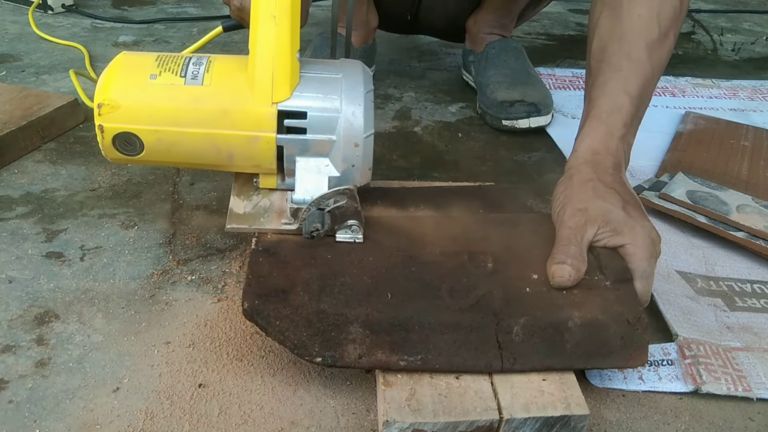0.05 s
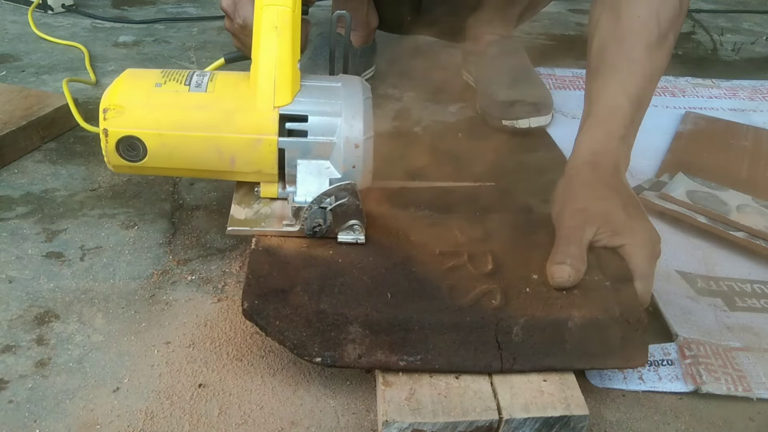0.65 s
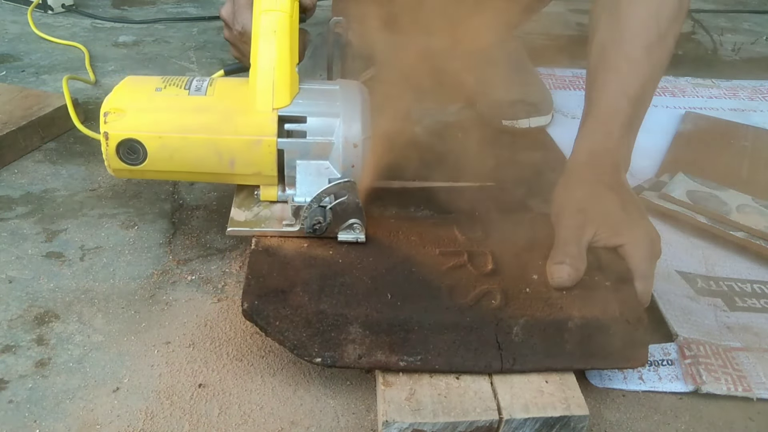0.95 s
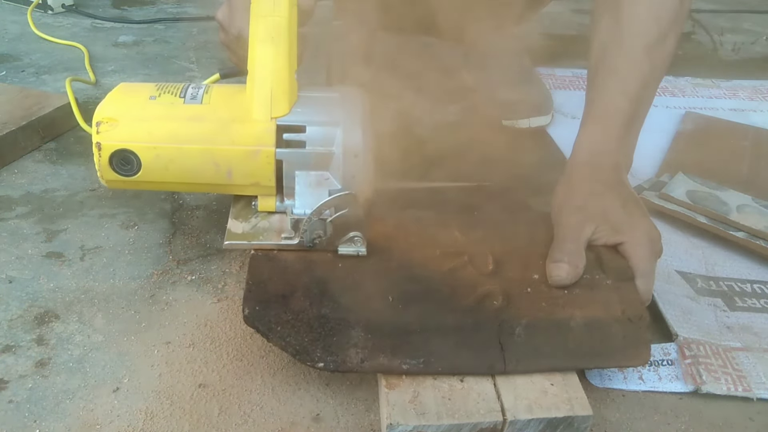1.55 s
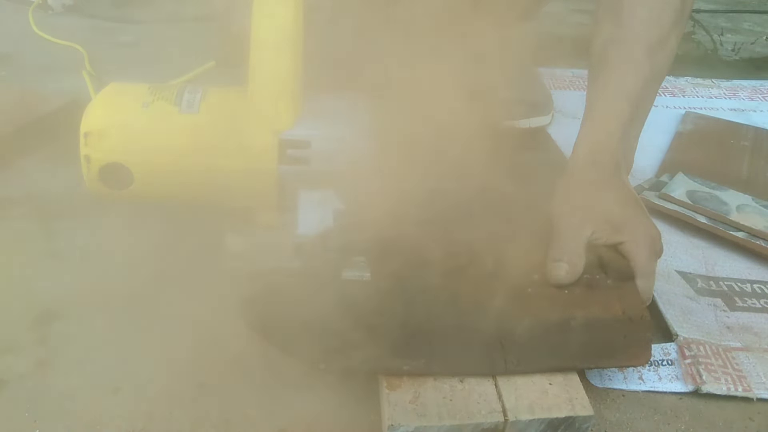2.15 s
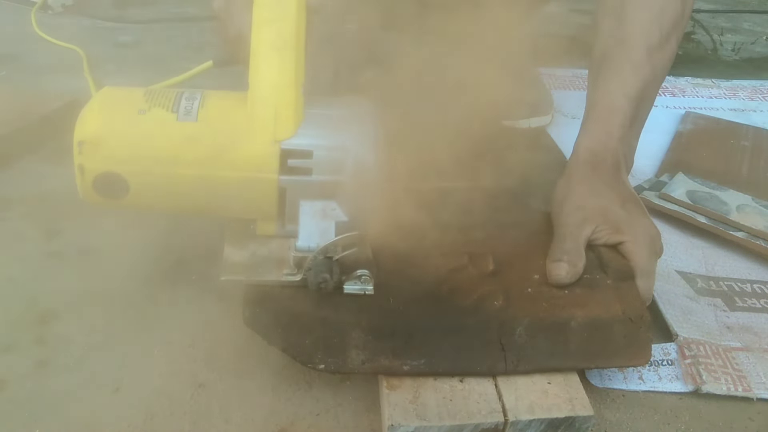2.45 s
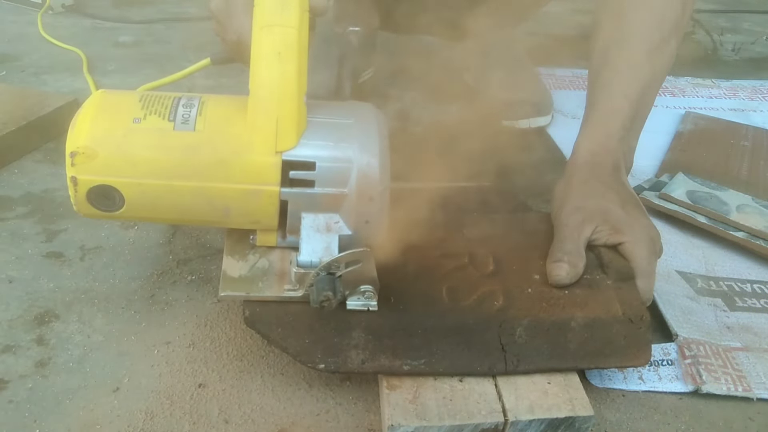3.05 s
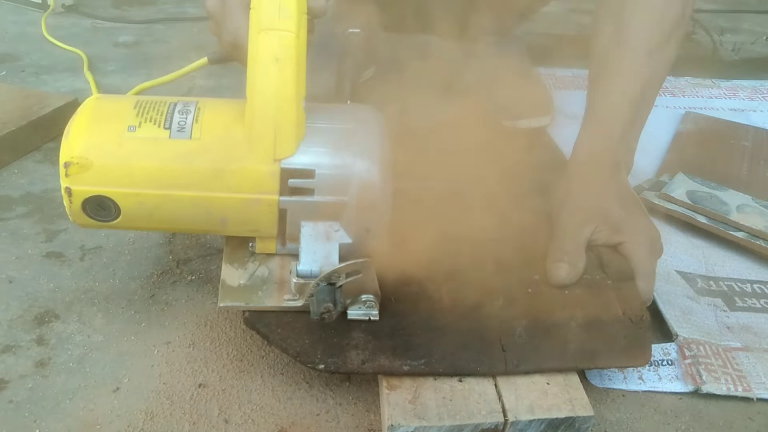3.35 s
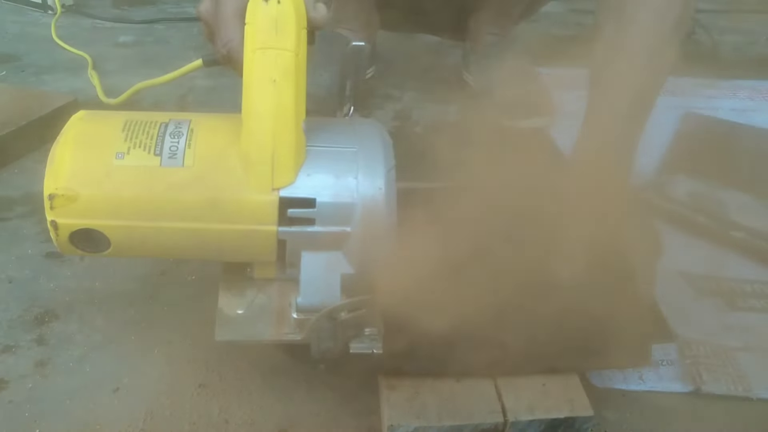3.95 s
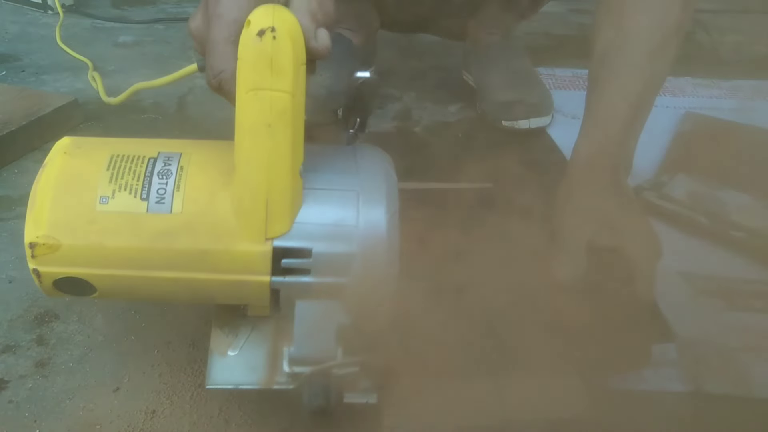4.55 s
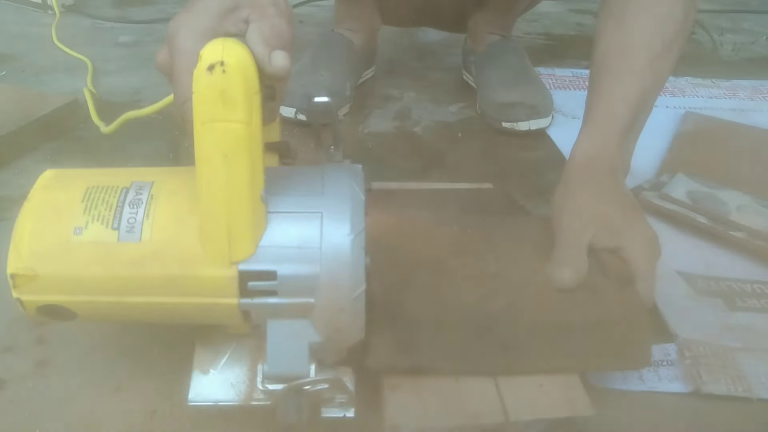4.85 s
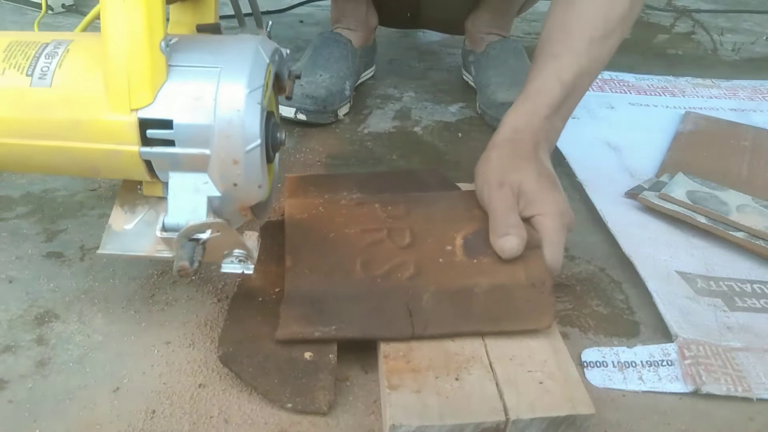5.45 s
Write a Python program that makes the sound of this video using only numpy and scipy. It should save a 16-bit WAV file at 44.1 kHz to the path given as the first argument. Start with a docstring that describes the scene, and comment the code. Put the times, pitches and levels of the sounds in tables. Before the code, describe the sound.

A handheld power cutter grinds through a clay tile close to the microphone. Its whine sags and recovers under load, over a gritty rasp and hiss, while the tile howls and the steel disc sings shifting high notes. Near the end the cut-off piece breaks away with a brief rattle, and the blade screeches against the cut edge as the motor starts to slow. Fan rush and a faint low hum lie underneath.

```python
"""At a workbench, close by, a handheld power cutter grinds its diamond blade through a clay tile.
The motor sags and recovers with the load, and the grit rasps once a turn. The tile howls, and the
steel disc sings one note after another as the slot pinches it. The cut-off piece breaks away and
rattles; the motor coasts down while the blade screeches along the cut edge.
Under it all are the rush of the cooling fan and a faint low hum."""
import sys
import numpy as np
from scipy import signal
from scipy.fft import rfft, irfft, next_fast_len
from scipy.io import wavfile
from scipy.ndimage import uniform_filter1d, minimum_filter1d, map_coordinates

SR = 44100
rng = np.random.default_rng(int(sys.argv[2]) if len(sys.argv) > 2 else 0)


def wrap_up_sound(samples):
    """Save the sound to the file named by the first command line argument, as 16-bit audio."""
    columns = np.atleast_2d(samples).T
    # keep every value between -1 and 1, then stretch to whole-number steps
    tamed = np.clip(columns, -1, 1)
    steps = np.round(tamed * 32767).astype(np.int16)
    wavfile.write(sys.argv[1], SR, steps)


N = 247469
T = np.arange(N) / SR

# Levels in the tables are relative: each layer adds its own gain.
# Tones of the background hum: pitch_hz, level_db
HUM_TONES = [(48.4, -71.5), (96.9, -66.5), (177.6, -69.5)]
# Blade speed under power, sagging when the blade is pushed: time_s, turns_per_s
POWERED_SPEED = [(0, 140), (.25, 161), (.4, 170), (.62, 177), (1.1, 172), (1.65, 163), (2.65, 171),
                 (2.8, 143), (3, 118), (3.2, 100), (3.42, 130), (3.55, 139), (3.72, 110), (3.85, 132),
                 (4.07, 152), (4.19, 133), (4.45, 151), (4.83, 162)]
# Tone colour of the fan's rush: pitch_hz, level_db
FAN_SPECTRUM = [(20, 0), (100, -10.5), (300, -9.5), (600, -5), (880, 4.5), (1200, -3), (1600, 0),
                (2500, 0.5), (3200, -6.5), (4200, 4.5), (5100, 1), (5800, -18), (7000, -10.5), (9000, -7),
                (15500, -15.5)]
# Whines on a multiple of the blade speed and on the multiples either side of it:
# start_s, end_s, multiple, level_db, neighbours_relative_db
BLADE_WHINES = [(0.164, 0.81, 13, -29, -5), (1.128, 1.424, 6, -33, -31), (1.92, 2.29, 3, -56, -15),
                (2.78, 3.15, 7, -49, -32), (3.539, 4.015, 7, -37, -11), (4, 4.69, 7, -48, -11)]
# The cut-off piece knocks on the boards: time_s, level_db
OFFCUT_KNOCKS = [(4.747, -17.5), (4.756, -14.5), (4.784, -22.5), (4.805, -19.5), (4.82, -17),
                 (4.833, -17.5), (4.859, -25.5), (4.872, -32)]
# Notes that piece rings with: pitch_hz, level_db, ring_s (time to fade by 60 dB)
OFFCUT_NOTES = [(817, -9, 0.1), (1020, -0.5, 0.1), (1080, -18, 0.04), (2000, -12.5, 0.03),
                (2950, -11.5, 0.027)]
# Tone colours of the tile's rumble, the slot's rasp and the flying grit's fizz: pitch_hz, level_db
RUMBLE_SPECTRUM = [(20, -16.5), (50, -23), (130, -3), (250, -1), (450, 1), (650, -2), (1000, 0),
                   (2500, -63)]
RASP_SPECTRUM = [(300, -11), (650, -8.5), (800, -6), (980, 6.5), (1250, -1), (1550, 8.5), (1900, -0.5),
                 (3000, -2), (3600, 3), (4300, 1.5), (5200, 10), (5900, -2), (8000, -7), (16000, -55)]
FIZZ_SPECTRUM = [(1500, -12), (3500, -53), (5000, 8), (6000, 11.5), (6800, 0.5), (8500, 3.5), (9300, 1),
                 (10300, 4.5), (11200, 4.5), (12000, 11), (12800, 1), (14000, 6.5), (14800, 5),
                 (15800, -24)]
# Loudness of those three over time: time_s, level_db
RUMBLE_LOUDNESS = [(0.0, -31.5), (0.8, -35.5), (1.12, -60), (2.22, -47), (2.43, -51), (3.25, -67),
                   (3.43, -40.5), (3.49, -51), (4.02, -38.5), (4.14, -45), (4.19, -38.5), (4.42, -48.5),
                   (4.66, -48.5), (4.7, -55)]
RASP_LOUDNESS = [(0.0, -25), (0.1, -49), (0.21, -32), (0.34, -44.5), (0.37, -41), (0.65, -66),
                 (1.62, -51.5), (1.69, -54), (1.74, -53.5), (4.32, -56), (4.67, -54.5), (4.7, -56.5)]
FIZZ_LOUDNESS = [(0.0, -19.5), (0.04, -30), (0.64, -33), (1.05, -37), (1.16, -44), (1.94, -48.5),
                 (2.11, -51), (2.57, -51), (2.79, -53), (3.14, -49), (3.21, -58), (3.87, -37), (4.07, -54),
                 (4.11, -38.5), (4.12, -45), (4.67, -43.5), (4.7, -62)]
# The tile howls under the blade: start_s, end_s, pitch_hz, width_hz, level_db
TILE_HOWLS = [(-.1, 0.53, 2156, 330, -25.5), (-.1, 1, 962, 148, -28), (0.153, 0.823, 1645, 332, -28),
              (0.474, 1, 2364, 254, -29.5), (0.818, 1.298, 1633, 101, -24.5), (0.933, 1.437, 997, 84, -31),
              (1.086, 1.36, 2446, 130, -37), (1.329, 1.605, 1581, 103, -24.5),
              (1.568, 1.82, 1660, 120, -34.5), (3.132, 3.229, 2150, 30, -36.5),
              (3.126, 3.24, 3440, 50, -41), (3.297, 3.42, 880, 140, -38), (3.387, 3.485, 1640, 400, -37),
              (3.513, 4.304, 882, 161, -44.5), (3.714, 4.497, 1468, 89, -42), (4.555, 4.67, 2396, 150, -35),
              (5.474, 5.597, 2730, 200, -43.5)]
# The disc's notes are waves running round it; spin lowers those going against it and raises the rest:
# name, group, cruise_pitch_hz, shift_hz_per_turn_per_s, width_hz, level_in_group_db
DISC_NOTES = [("A", "first", 3820, -3, 110, -7), ("B", "first", 5690, -1, 70, -4),
              ("C", "second", 6345, .5, 50, 0), ("D", "first", 7080, -3.4, 60, -6),
              ("E", "second", 8110, 3.5, 70, -1), ("F", "first", 9160, -3, 100, 0),
              ("G", "second", 9660, 1.2, 70, -5), ("H", "first", 11750, -5, 70, -8),
              ("I", "second", 12200, 1.2, 170, -4), ("J", "first", 13460, 6, 70, -11),
              ("K", "second", 14960, 8, 130, -2), ("L", "first", 15050, -5, 110, -16)]
# These notes swell and fade in two groups: time_s, level_db
FIRST_GROUP_LOUDNESS = [(0.0, -31), (1.3, -35.5), (1.66, -33.5), (1.99, -52), (2.59, -43.5), (2.62, -55),
                        (3.31, -51.5), (3.47, -34), (3.89, -43), (4.21, -38.5), (4.38, -40.5), (4.67, -51),
                        (4.7, -56)]
SECOND_GROUP_LOUDNESS = [(0.0, -36), (0.41, -31), (1.14, -46.5), (1.4, -42), (1.98, -44), (2.03, -55),
                         (2.24, -53), (2.34, -40), (3.07, -53), (3.31, -47.5), (3.36, -53), (4.42, -69),
                         (4.5, -45)]
# The slot pinches the disc and one note takes over: start_s, end_s, note_name, level_db
DISC_PINCHES = [(-.1, 1.14, "H", -32), (.1, .85, "K", -31), (0.176, 0.848, "J", -22.5),
                (.25, 1.057, "C", -27), (0.606, 1.23, "D", -34.5), (1.06, 1.385, "A", -32),
                (1.36, 1.655, "A", -38.5), (1.553, 1.978, "I", -40), (1.714, 1.9, "J", -34),
                (1.79, 2.103, "B", -32), (2.3, 2.553, "B", -39.5), (3.377, 3.897, "B", -41),
                (2.207, 2.69, "C", -36), (2.324, 2.653, "G", -38), (2.333, 2.897, "K", -30.5),
                (2.4, 3.3, "J", -46.5), (2.905, 3.17, "H", -44), (3.11, 3.387, "D", -31),
                (3.05, 3.36, "L", -40), (3.42, 4.447, "J", -34), (3.558, 4.05, "F", -30),
                (3.776, 4.164, "K", -32), (4.14, 4.426, "H", -35.5), (4.436, 4.685, "B", -30),
                (4.625, 4.701, "E", -31)]
# The side of the freed blade rubs the cut edge: start_s, end_s, level_db
EDGE_RUBS = [(4.716, 4.835, -33), (4.84, 5.33, -46), (5.05, 5.09, -38.5), (5.18, 5.186, -35),
             (5.228, 5.256, -34), (5.276, 5.278, -27), (5.31, 5.464, -36), (5.345, 5.422, -24.5),
             (5.464, 5.548, -22), (5.596, 5.63, -34.5)]
# Pitch of that rubbing: time_s, pitch_hz
EDGE_RUB_PITCH = [(4.72, 5010), (4.776, 5070), (5.272, 5206), (5.572, 4740), (5.6, 5100)]
# The blade binds in the slot: start_s, end_s, first_hz, last_hz, width_hz, steadiness, level_db
SLOT_BINDS = [(-.08, .23, 4860, 5120, 170, 5, -17.5), (.18, .65, 5100, 5480, 450, .5, -27),
              (1.9, 2.25, 4500, 4380, 450, .3, -38), (2.73, 2.87, 5300, 5500, 350, .3, -37),
              (2.92, 3.13, 4400, 4150, 300, .3, -38), (3.45, 3.63, 4300, 5000, 400, .3, -33),
              (3.88, 4.38, 4950, 4980, 230, .3, -34), (4, 4.22, 5520, 5580, 180, .4, -26),
              (4.24, 4.54, 5430, 5700, 220, .4, -26)]

CRUISE_TURNS_PER_S = 170  # the disc's notes are listed at this speed
COAST_S = 1.84  # time from power off to half speed
THROUGH_S, RELEASE_DB_PER_S = 4.73, 99  # the blade leaves the tile and the grinding dies away
PEAK_LIMIT, TOP_HZ = .65, 15520


def amp(db):
    """Turn decibels into a gain."""
    return 10 ** (np.asarray(db) / 20)


def unit(x):
    """Scale a signal to an average (rms) strength of 1."""
    return x / np.sqrt(np.mean(np.abs(x) ** 2) + 1e-20)


def curve(points):
    """Join (time, value) points with straight lines, one value per sample."""
    return np.interp(T, *np.transpose(points))


def wobble(rate):
    """A smooth random curve through `rate` points a second."""
    return map_coordinates(rng.standard_normal(4096), [T * rate + 2], order=2, mode="wrap")


def shifted(x):
    """Slide a signal by a random time, so that notes sharing it each move on their own."""
    return np.roll(x, rng.integers(N))


def filtered(x, response):
    """Turn each frequency up or down by the gain that `response` gives it."""
    size = next_fast_len(N + 8192)
    return irfft(rfft(x, size) * response(np.fft.rfftfreq(size, 1 / SR)), size)[:N]


def coloured(x, spectrum):
    """Give a signal a tone colour from a table, at strength 1."""
    pitches, db = np.transpose(spectrum)
    return unit(filtered(x, lambda hz: amp(np.interp(np.log(hz + 1), np.log(pitches), db))))


def swell(start, end, fade_s):
    """A gain that rises softly around `start` and falls around `end`."""
    edge = np.clip(np.minimum(T - start, end - T) / fade_s, -1, 1)
    return .5 + .5 * np.sin(np.pi / 2 * edge)


def resonate(force, hz, width_hz, skirt_hz, steadiness):
    """A force rings a gliding note and friction evens its loudness; the real part is the sound."""
    carrier = np.exp(2j * np.pi * np.cumsum(hz) / SR)
    envelope = force / carrier
    for width in (width_hz, skirt_hz):  # each pass keeps only what lies near the note
        envelope = signal.lfilter([1], [1, -np.exp(-np.pi * width / SR)], envelope)
    envelope = unit(envelope)
    return unit(envelope / np.sqrt(1 + steadiness * np.abs(envelope) ** 2)) * carrier


def blade_speed():
    """Turns per second: set by the load, then coasting down against the drag of the fan."""
    power_off_s = POWERED_SPEED[-1][0]
    return curve(POWERED_SPEED) / (1 + np.maximum(T - power_off_s, 0) / COAST_S)


def cutting_db(loudness):
    """A level that dies away once the blade is through."""
    return curve(loudness) - RELEASE_DB_PER_S * np.maximum(T - THROUGH_S, 0)


def grit(turns, throb_db, clump_db):
    """Noise of grains tearing off in clumps, throbbing as the rim's high spot comes round."""
    level_db = throb_db * np.cos(2 * np.pi * turns) + clump_db * wobble(400)
    return unit(rng.standard_normal(N) * amp(level_db))


def rim(turns):
    """The uneven rim strikes the same pattern on every turn."""
    position = np.linspace(0, 1, 1024)
    bumps = sum(np.cos(2 * np.pi * (k * position + rng.random())) for k in range(3, 18))
    return unit(np.interp(turns % 1, position, bumps))


def hum():
    """A faint low hum lies under everything."""
    return sum(np.sqrt(2) * amp(db) * np.sin(2 * np.pi * hz * T + .36 * wobble(4.6))
               for hz, db in HUM_TONES)


def fan(turns, speed):
    """The motor's cooling fan blows, softer as it slows."""
    level_db = -41 + 10 * np.log10(speed / 150) + .44 * wobble(30)
    return amp(level_db) * coloured(grit(turns, throb_db=-.5, clump_db=2.5), FAN_SPECTRUM)


def whine(turns):
    """Tones that follow the shaft: the motor's thin whistle and the blade's whines."""
    whistle_cycles = 76 * turns
    out = amp(-58 + 3.5 * wobble(14)) * np.sin(2 * np.pi * whistle_cycles + .7 * wobble(150))
    flutter, slip = amp(2.2 * wobble(35)), .35 * wobble(70)
    tone = lambda k: np.sqrt(2) * shifted(flutter) * np.sin(2 * np.pi * k * turns + shifted(slip))
    for start, end, multiple, db, neighbours_db in BLADE_WHINES:
        tones = tone(multiple) + amp(neighbours_db) * (tone(multiple - 1) + tone(multiple + 1))
        out += amp(db) * swell(start, end, fade_s=.039) * tones
    return out


def offcut_rattle():
    """The loose piece drops and chatters; each gritty knock rings the clay briefly and unsteadily."""
    out, t = np.zeros(N), np.arange(SR // 5) / SR
    jitter = .6 * wobble(250)
    attack = 1 - np.exp(-t / .0037)
    for start, db in OFFCUT_KNOCKS:
        ring = np.zeros(len(t))
        for hz, note_db, ring_s in OFFCUT_NOTES:
            decay = amp(note_db + rng.normal(0, 1.5) - 60 * t / ring_s)
            ring += decay * np.sin(2 * np.pi * hz * t + shifted(jitter)[:len(t)])
        crack = amp(-14.5 - 60 * t / .016) * rng.standard_normal(len(t))
        out[round(start * SR):][:len(t)] += amp(db + 2.5) * (ring * attack + crack)
    return out


def grinding(turns):
    """The tile rumbles, the slot rasps and flying grit fizzes as the blade is pushed in unevenly."""
    push_db = 1.3 * wobble(25.25)
    force = lambda: grit(turns, throb_db=1.5, clump_db=1) + amp(-14.5) * rim(turns)
    rumble_db = cutting_db(RUMBLE_LOUDNESS) - 3 + push_db + 1.5 * wobble(16)
    rumble = amp(rumble_db) * coloured(force(), RUMBLE_SPECTRUM)
    rasp_db = cutting_db(RASP_LOUDNESS) + 17 + push_db
    rasp = amp(rasp_db) * coloured(force(), RASP_SPECTRUM)
    fizz_db = cutting_db(FIZZ_LOUDNESS) + 9 + push_db + 1.6 * wobble(50)
    fizz = amp(fizz_db) * coloured(grit(turns, throb_db=-.5, clump_db=2.3), FIZZ_SPECTRUM)
    return rumble + rasp + fizz


def tile_howling(turns):
    """Grit and rim ring one note of the tile after another; long howls come and go slowly."""
    out = np.zeros(N)
    force = grit(turns, throb_db=-1, clump_db=6) + amp(-15) * rim(turns)
    grip, waver_hz = unit(amp(2.2 * wobble(20))), 18 * wobble(11)
    for start, end, hz, width_hz, db in TILE_HOWLS:
        motion = resonate(force, hz + shifted(waver_hz), width_hz, skirt_hz=278, steadiness=.34)
        level = amp(db + 4) * swell(start, end, fade_s=.021 + .12 * (end - start))
        out += level * shifted(grip) * motion.real
    return out


def disc_singing(turns, speed):
    """The steel disc's notes ring in two groups, drift with the spin and flare up when pinched."""
    out = np.zeros(N)
    force = grit(turns, throb_db=1.5, clump_db=1) + amp(-17) * rim(turns)
    group_db = {"first": cutting_db(FIRST_GROUP_LOUDNESS), "second": cutting_db(SECOND_GROUP_LOUDNESS)}
    grip = unit(amp(2.5 * wobble(24) + 1.8 * wobble(7)))
    waver_hz = 24 * wobble(30)
    for name, group, hz, shift, width_hz, db in DISC_NOTES:
        level = amp(group_db[group] + db + 7)
        for start, end, pinched_note, pinch_db in DISC_PINCHES:
            if pinched_note == name:
                flare = amp(pinch_db + 5.5) * swell(start, end, fade_s=.019 + .25 * (end - start))
                level = np.hypot(level, flare)
        pitch_hz = hz + shift * (speed - CRUISE_TURNS_PER_S) + shifted(waver_hz)
        motion = resonate(force, pitch_hz, width_hz, skirt_hz=425, steadiness=.13)
        out += level * shifted(grip) * motion.real
    return out


def blade_screech(turns):
    """The wobbling disc catches and lets go of the clay in quick chirps, in the slot and on the edge."""
    force = grit(turns, throb_db=-1.5, clump_db=3)
    catch = unit(1 + .18 * np.cos(2 * np.pi * turns + 1.46 * wobble(80)))
    pressure = sum(amp(db + 4.5) * swell(start, end, fade_s=.011) for start, end, db in EDGE_RUBS)
    motion = pressure * resonate(force, curve(EDGE_RUB_PITCH), width_hz=380, skirt_hz=260, steadiness=1.2)
    for start, end, first_hz, last_hz, width_hz, steadiness, db in SLOT_BINDS:
        glide_hz = np.interp(T, [start, end], [first_hz, last_hz])
        bind = resonate(shifted(force), glide_hz, width_hz, skirt_hz=360, steadiness=steadiness)
        motion += amp(db + 4.5) * swell(start, end, fade_s=.02 + .078 * (end - start)) * bind
    motion *= catch
    overtone = (motion ** 3).real / (np.abs(motion) + 1e-9)  # three times the pitch
    return motion.real + amp(-1) * overtone


def scene():
    """The turning blade drives the cutting sounds; both ears hear the same mix."""
    speed = blade_speed()
    turns = np.cumsum(speed) / SR
    cutter = grinding(turns) + disc_singing(turns, speed) + tile_howling(turns)
    cutter += whine(turns) + blade_screech(turns) + fan(turns, speed)
    mono = cutter + offcut_rattle() + hum()
    return np.array([mono, mono])


def record(dry):
    """A limiter holds down the loudest peaks, and the highest treble is cut off."""
    needed_gain = np.minimum(1, PEAK_LIMIT / (np.abs(dry[0]) + 1e-9))
    smooth_gain = uniform_filter1d(minimum_filter1d(needed_gain, size=256), size=256)
    return np.array([filtered(side * smooth_gain, lambda hz: hz < TOP_HZ) for side in dry])


dry = scene()
out = record(dry)
wrap_up_sound(out)
```